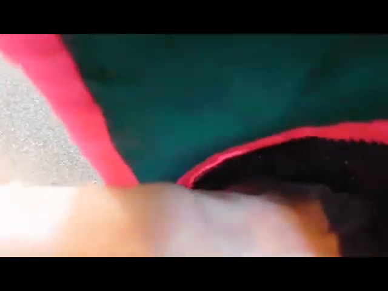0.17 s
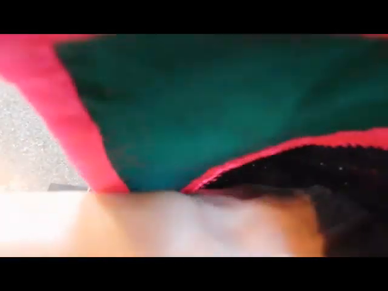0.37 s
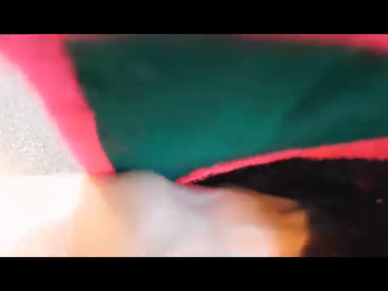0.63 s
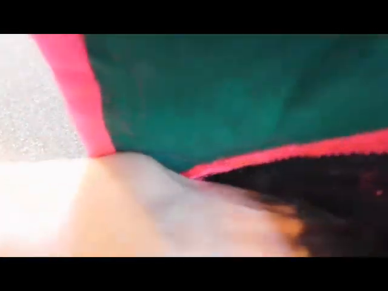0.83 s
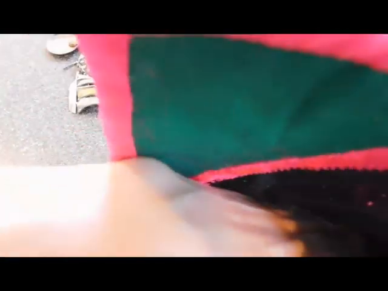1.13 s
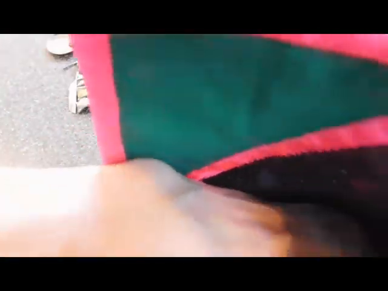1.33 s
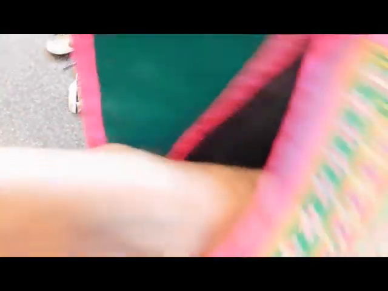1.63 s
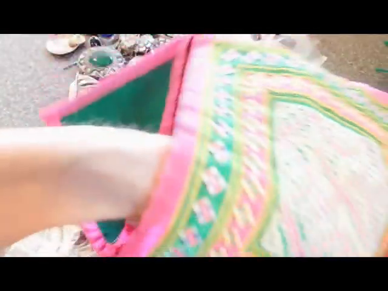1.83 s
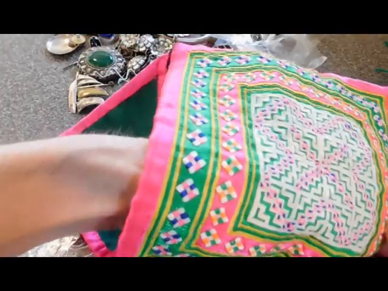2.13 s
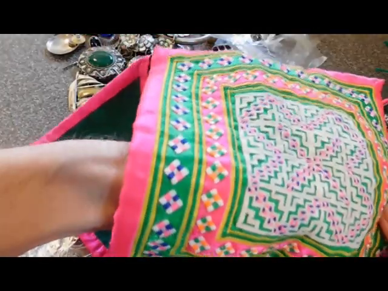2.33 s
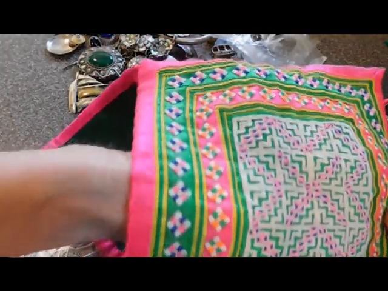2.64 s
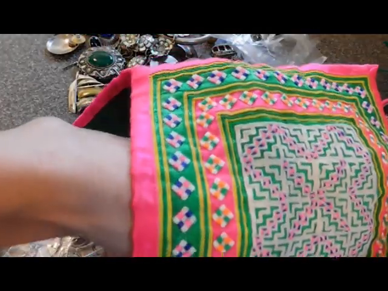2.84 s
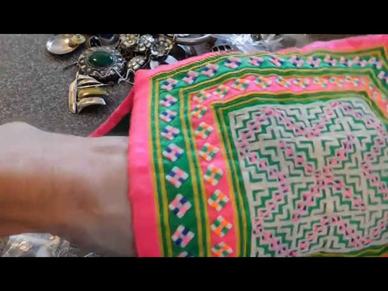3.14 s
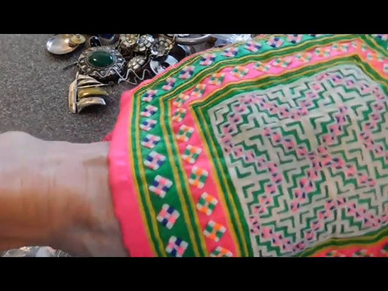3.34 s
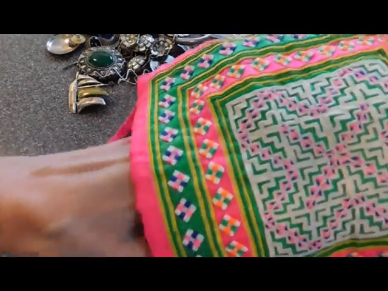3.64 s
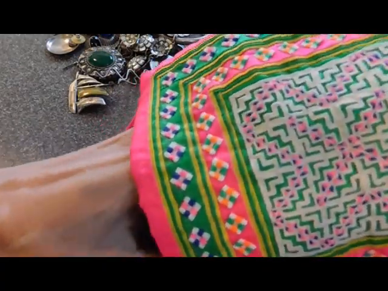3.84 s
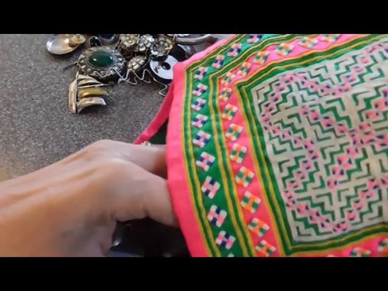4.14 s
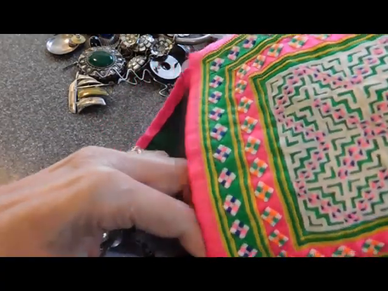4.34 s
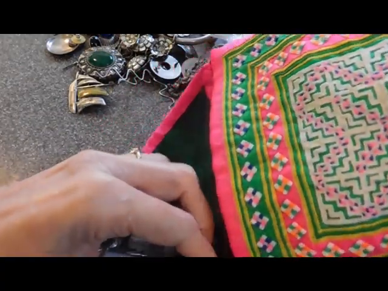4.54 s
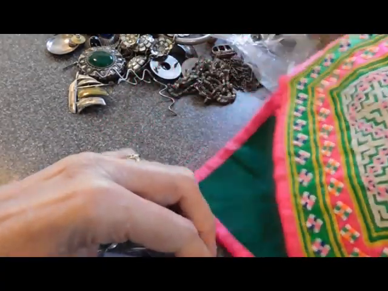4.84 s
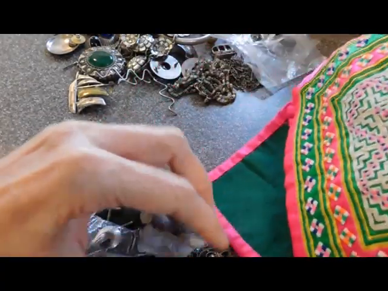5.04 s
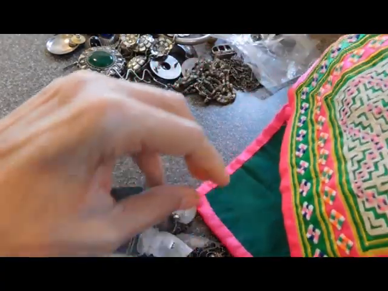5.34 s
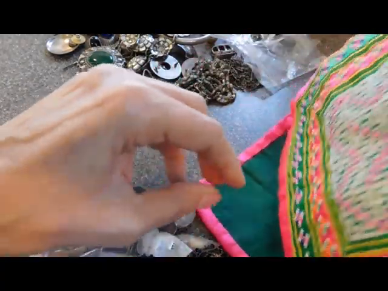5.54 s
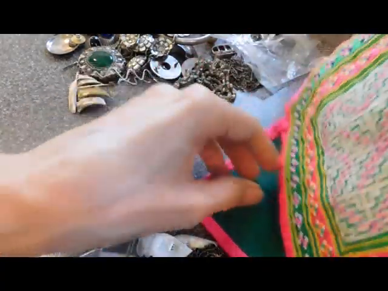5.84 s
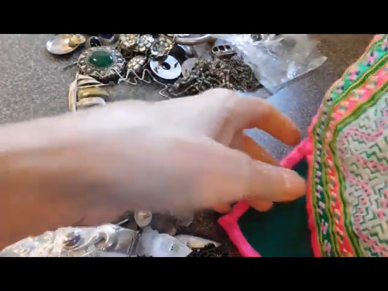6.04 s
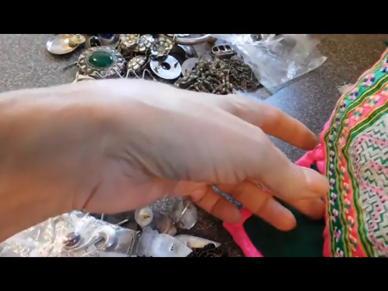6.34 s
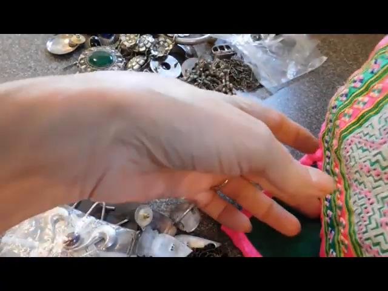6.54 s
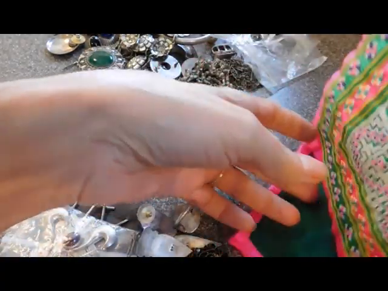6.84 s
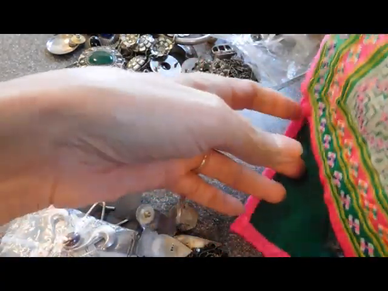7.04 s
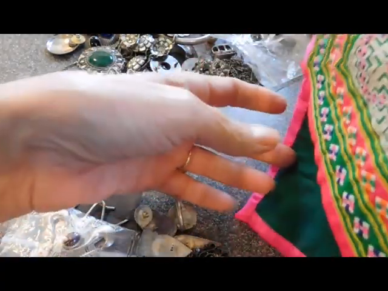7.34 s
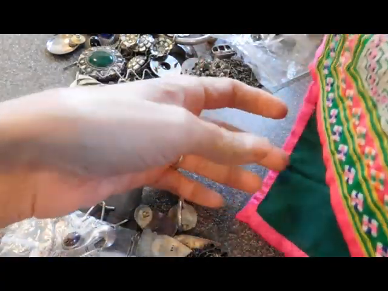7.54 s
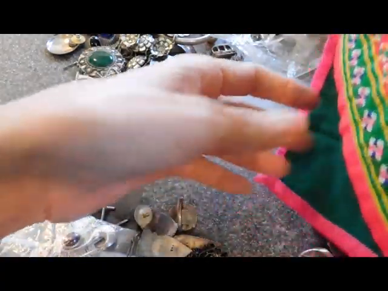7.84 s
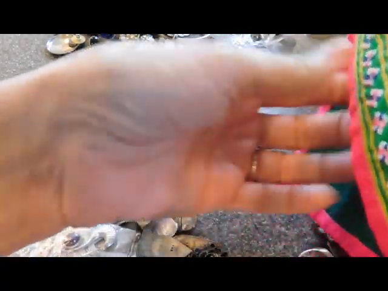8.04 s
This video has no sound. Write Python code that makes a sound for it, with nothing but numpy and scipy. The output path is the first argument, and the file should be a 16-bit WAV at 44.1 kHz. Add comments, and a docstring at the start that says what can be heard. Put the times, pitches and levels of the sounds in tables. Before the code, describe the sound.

Close up in a quiet room, small metal jewelry pieces tick and tinkle lightly as a fabric bag is handled. After a short pause the clinking thickens, mixed with grainy cloth rustle and knocks on the table, and a bangle rings out briefly. The bag slides with a soft rasp, the clinks thin out, then several pieces clatter sharply onto the tabletop. Faint air noise, rumble and hiss lie underneath.

```python
"""Small metal pieces clink and chatter as a hand rummages in a cloth bag of jewellery on a hard table.
Each contact ticks, sets the pieces ringing and leaves a sizzle of chain links. Cloth drags over the
table top and heavier things knock on it, both sounding its resonances. It is all close and in stereo;
the quiet room answers with a short tail over ventilation, rumble, a faint hum and microphone hiss."""
import sys
import numpy as np
from scipy import signal
from scipy.fft import rfft, irfft
from scipy.io import wavfile
from scipy.ndimage import uniform_filter1d, map_coordinates

SR = 44100
rng = np.random.default_rng(int(sys.argv[2]) if len(sys.argv) > 2 else 0)


def file_out(sig):
    """Save sig as 16-bit WAV at sys.argv[1]."""
    # one column per channel
    cols = np.atleast_2d(sig).T
    # limit, then scale
    lim = np.clip(cols, -1, 1)
    pcm = np.round(lim * 32767).astype(np.int16)
    wavfile.write(sys.argv[1], SR, pcm)


N = 361476
T = np.arange(N) / SR
SIDES = np.array([[1], [-1]])  # left, right: a positive pan leans left

# Metal meeting metal. Each row: start in seconds, tick in dB, then any pieces struck, each with its
# ring level in dB.
CONTACTS = [(0.5234, -60), (0.5423, -48.5, "cap", -60, "charm", -63), (0.51, -59, "medal", -66),
            (0.5925, -54, "cap", -62, "clasp", -59), (0.7153, -50, "clasp", -60, "charm", -59),
            (0.7741, -57, "bangle", -67), (0.9118, -53, "pendant", -52, "charm", -60),
            (0.9537, -45, "pendant", -50, "charm", -54, "ring", -58), (0.968, -50, "bangle", -59),
            (1.032, -56, "pendant", -62),
            (1.08, -40.5, "pendant", -47.5, "charm", -49, "bangle", -57, "medal", -56),
            (1.1646, -48, "medal", -54, "charm", -57, "pendant", -58), (2.2677, -51, "pendant", -61),
            (2.2997, -49, "medal", -50, "clasp", -53),
            (2.3311, -38, "charm", -42, "cap", -44, "medal", -39, "ring", -48),
            (2.3533, -40, "pendant", -41, "medal", -38.5, "charm", -43, "clasp", -47.5),
            (2.3771, -36.5, "pendant", -36.5, "charm", -42, "cap", -48, "clasp", -50),
            (2.4104, -53, "pendant", -54, "charm", -56), (2.4988, -49, "bangle", -49.5, "pendant", -53),
            (2.7074, -49, "bangle", -47, "clasp", -50), (2.7324, -39, "bangle", -36.5, "clasp", -49),
            (2.7848, -45, "medal", -39, "charm", -49),
            (2.8078, -46, "charm", -39, "pendant", -44, "medal", -45, "clasp", -50.5),
            (2.8305, -52, "charm", -42, "bangle", -44.5, "pendant", -47.5, "clasp", -49),
            (2.9302, -50, "clasp", -51, "bangle", -53), (2.974, -45, "bangle", -44.5, "clasp", -54),
            (3.034, -48, "bangle", -40, "charm", -57),
            (3.0544, -40.5, "bangle", -38, "clasp", -52, "cap", -52),
            (3.0753, -43, "bangle", -36.5, "charm", -50), (3.1483, -42.5, "bangle", -43.5, "clasp", -61),
            (3.249, -46, "bangle", -50, "charm", -55, "clasp", -56), (3.3084, -64, "bangle", -50),
            (3.3532, -48, "bangle", -38, "clasp", -50),
            (3.4444, -52, "bangle", -46, "charm", -50, "pendant", -53),
            (3.455, -54, "clasp", -44, "bangle", -45.5, "charm", -54), (3.485, -58, "bangle", -35),
            (3.5314, -53, "bangle", -43, "medal", -55), (3.727, -47, "bangle", -45, "clasp", -53.5),
            (3.9426, -61, "bangle", -47, "clasp", -61),
            (3.981, -46.5, "bangle", -47, "clasp", -54, "pendant", -55, "charm", -57), (4.362, -51),
            (4.5838, -49, "cap", -52, "bangle", -57), (4.6598, -38.5, "cap", -46, "charm", -52),
            (4.7098, -53, "bangle", -50, "clasp", -56),
            (4.8848, -33.5, "bangle", -25, "clasp", -35, "cap", -36),
            (4.9472, -47, "bangle", -39, "clasp", -50), (4.9781, -41.5, "bangle", -32, "clasp", -48),
            (4.9982, -55, "charm", -51, "clasp", -56), (5.0553, -43, "bangle", -50),
            (5.0823, -39, "cap", -45, "bangle", -52, "clasp", -54),
            (5.1427, -43, "bangle", -39.5, "clasp", -52, "cap", -50), (5.1994, -58, "bangle", -44),
            (5.2214, -65, "bangle", -49), (5.2839, -56, "bangle", -60), (5.312, -54, "cap", -54),
            (5.382, -51, "cap", -55), (4.8, -65, "ring", -62), (5.471, -62, "bangle", -60),
            (5.536, -65, "bangle", -53), (5.7862, -55, "bangle", -60, "cap", -64),
            (5.8874, -62, "bangle", -56), (6.1295, -50, "ring", -47), (6.1858, -56, "ring", -51),
            (6.8917, -50, "ring", -56), (7.1384, -54, "bangle", -65),
            (7.215, -33, "medal", -35, "bangle", -49, "pendant", -47),
            (7.2728, -37, "medal", -36, "ring", -40.5, "bangle", -42),
            (7.2938, -45, "medal", -37, "bangle", -47), (7.3044, -43, "medal", -40, "ring", -47),
            (7.3294, -50, "medal", -50, "clasp", -52), (7.395, -45, "ring", -41, "cap", -48),
            (7.4098, -49, "bangle", -50, "ring", -52)]
# The table top's low resonances and its deeper thump. Each row: pitch in Hz, width in Hz, gain in dB.
TABLE_LOW_MODES = [(838, 315, -2), (967, 370, -3)]
TABLE_THUMP_MODES = [(216, 146, -2.5), (424, 410, 2)]


def undb(db):
    """Decibels to gain."""
    return 10 ** (np.asarray(db) / 20)


def unit(x):
    """Scale to rms 1."""
    return x / np.sqrt(np.mean(x ** 2))


def pan(db):
    """Left and right gains, db apart."""
    return undb(SIDES * db / 2)


def wander(rate):
    """A smooth drift through rate random values a second, at rms 1."""
    return unit(map_coordinates(rng.standard_normal(size=2000), [T * rate], order=2, mode="wrap"))


def stereo_noise(split_hz, count=N):
    """Noise that is centred in the bass and wide above split_hz."""
    mid, side = rng.standard_normal((2, count))
    return mid + SIDES * signal.lfilter(*signal.butter(1, split_hz, "high", fs=SR), side)


def resonate(x, modes):
    """Sum of steep resonances (each applied twice); white noise keeps about its rms."""
    power = sum(undb(2 * db) * np.pi * width / SR / 2 for _, width, db in modes)
    out = 0
    for hz, width, db in modes:
        b, a = signal.iirpeak(hz, hz / width, fs=SR)
        out += undb(db) * signal.lfilter(b, a, signal.lfilter(b, a, x))
    return out / np.sqrt(power)


def bursts(times, db, pan_db, decay_s):
    """Stereo envelope: a sudden rise and exponential fall at each time."""
    spikes = np.zeros((2, N))
    np.add.at(spikes.T, (times * SR).astype(int), (undb(db) * pan(pan_db)).T)
    return signal.lfilter([1], [1, -np.exp(-1 / (decay_s * SR))], spikes)


def swells(starts, lengths, db, attack_s, release_s):
    """Envelope of overlapping swells: each rises, holds and dies away exponentially."""
    out = np.zeros(N)
    for start, length, gain in zip(starts, lengths, undb(db)):
        rise = np.clip((T - start) / attack_s, 0, 1)
        out += gain * rise * np.exp(-np.maximum(T - start - length, 0) / release_s)
    return out


def ventilation(level_db=-56, drift_db=1.78):
    """A soft rush of air, gently drifting in level and wider toward the treble."""
    # Tone of the air. Each row: frequency in Hz, relative level in dB.
    spectrum = [(41, -51), (70, -6.5), (108, -9), (219, -5), (344, -8), (869, -8.5), (1230, -10),
                (1490, -6), (1620, -10), (2600, -11.5), (5770, -21.5), (12000, -31), (15600, -46),
                (22000, -120)]
    # Stereo image. Each row: frequency in Hz, left-right likeness from 0 to 1.
    likeness = [(60, 0.89), (130, 0.61), (290, 0.32), (640, 0.11), (1400, 0.18), (3100, .01)]
    log_hz = np.log(np.maximum(np.fft.rfftfreq(N, 1 / SR), 1))
    tone_db, alike = (np.interp(log_hz, np.log(hz), values)
                      for hz, values in (np.transpose(spectrum), np.transpose(likeness)))
    mid, side = rfft(rng.standard_normal((2, N)))
    spread = np.sqrt(1 + alike) * mid + SIDES * np.sqrt(1 - alike) * side
    rush = unit(irfft(undb(tone_db) * spread, N))
    return undb(level_db + drift_db * wander(3.247)) * rush


def rumble():
    """The building's deep rumble and a drone above it, both swelling slowly."""
    # Level ride. Each row: time in seconds, deep rumble in dB, drone in dB.
    ride = [(0.0, -62, -74), (0.7, -67, -77), (1.7, -63, -79), (3.1, -62.5, -67), (3.9, -62.5, -66),
            (4.7, -63, -70), (5.9, -59.5, -68), (6.45, -62, -65), (6.9, -58.5, -63), (7.7, -62, -68),
            (8.2, -64, -64)]
    # Resonances of the two layers. Each row: pitch in Hz, width in Hz, gain in dB.
    deep_modes = [(29.5, 13, -6), (49.7, 12, 1), (63, 15.5, -6.5)]
    drone_modes = [(133, 72, 0)]
    times, *levels = np.transpose(ride)
    deep_gain, drone_gain = (undb(np.interp(T, times, db)) for db in levels)
    deep = unit(resonate(stereo_noise(300), deep_modes))
    drone = resonate(stereo_noise(380), drone_modes)
    return deep_gain * deep + drone_gain * drone


def hum(waver_db=2, waver_rad=1.5):
    """A faint, wavering low tone that comes and goes."""
    # Spells of hum. Each row: start in seconds, length in seconds, pitch in Hz, level in dB.
    spells = [(2.048, 0.61, 190, -68.5), (6.25, 1.3, 200, -67.5)]
    out = 0
    for start, length, hz, db in spells:
        tone = np.sqrt(2) * np.sin(2 * np.pi * hz * T + waver_rad * wander(5))
        out += tone * swells([start], [length], [db], attack_s=.11, release_s=.08)
    return out * undb(waver_db * wander(12))


def room_tone(pan_db=-1.5, lag_samples=4, hiss_db=-63):
    """Ventilation, rumble and hum reach the right microphone first; both microphones hiss."""
    left, right = (ventilation() + rumble() + hum()) * pan(pan_db)
    hiss = undb(hiss_db) * rng.standard_normal((2, N))
    return np.array([np.roll(left, lag_samples), right]) + hiss


def room_tail(x, gap_s=.00355, low_t60=.62, treble_t60=.48, low_db=-4.5, treble_db=-5):
    """The walls return a diffuse tail after a short gap; the treble dies sooner."""
    t = np.arange(SR) / SR
    noise = stereo_noise(1500, count=SR)
    low = signal.sosfilt(signal.butter(2, 3500, fs=SR, output="sos"), noise)
    tail = 0
    for band, db, t60 in ((low, low_db, low_t60), (noise - low, treble_db, treble_t60)):
        decay = np.log(1000) / t60
        tail += undb(db) * band * np.exp(-decay * t) * np.sqrt(2 * decay / SR)
    return signal.fftconvolve(x.mean(axis=0, keepdims=True), tail * (t > gap_s), axes=1)[:, :N]


def fibre_grains(split_hz, grain_db=1.3, slip_db=2.6):
    """Fibres catch and slip, making grainy, uneven noise."""
    noise = stereo_noise(split_hz)
    return unit(noise * undb(grain_db * rng.exponential(size=N) + slip_db * wander(45)))


def cloth(fidget_db=3, thump_db=-9, pan_db=-3):
    """Dragged cloth rubs the table into a low murmur, with a rasp and a fine crackle on top."""
    # Drags of the bag. Each row: start and length in seconds, then body, rasp and crackle in dB.
    strokes = [(0.14, .06, -72, -70, -68), (0.345, .03, -58, -62, -72), (0.57, .04, -68, -60, -72),
               (0.71, 0.041, -70, -62, -68), (0.92, .2, -74, -68, -68), (1.891, 0.048, -56, -63, -76),
               (2.3, .12, -64.5, -58.5, -66), (2.49, 0.027, -66, -55, -70), (2.675, .05, -51.5, -50, -65),
               (2.775, .07, -62, -55, -55), (3.016, .15, -56, -50, -58), (3.2, .17, -58, -57, -67),
               (3.429, 0.065, -56, -53, -59), (3.549, 0.027, -55, -60, -66),
               (3.658, .12, -56.5, -55.5, -63.5), (3.827, 0.066, -56.5, -50, -76),
               (3.936, 0.066, -54.5, -45, -73), (4.283, .16, -59, -58, -65.5),
               (4.561, 0.082, -53, -55.5, -63), (4.678, 0.058, -51, -44, -66), (4.758, .16, -51, -53, -73),
               (4.929, 0.095, -49.5, -41, -70), (5.077, .14, -55.5, -48, -75),
               (5.3, 0.062, -53.5, -47, -77), (5.4, .15, -56, -52, -78), (5.63, .2, -53, -52, -74),
               (5.86, .18, -51, -49.5, -76), (6.045, .12, -62, -51, -74), (6.2, .3, -65, -66, -74),
               (6.838, 0.11, -52, -49.5, -79), (7.135, .025, -62, -48, -72), (7.218, .08, -56, -37.5, -66),
               (7.32, .06, -53, -36, -62), (7.39, .07, -52, -44, -58), (7.6, .4, -66, -74, -80)]
    # The cloth is never quite still: resting levels of body, rasp and crackle in dB.
    resting_db = (-72, -72, -77)
    # Colour of the rasp. Each row: pitch in Hz, width in Hz, gain in dB.
    rasp_modes = [(1505, 440, -1.5), (1789, 496, 2), (2135, 810, -2.5), (2814, 1500, -9.5)]
    starts, lengths, *levels = np.transpose(strokes)
    fidget = fidget_db * wander(6)
    body_gain, rasp_gain, crackle_gain = (
        swells(starts, lengths, db, attack_s=.022, release_s=.026) + undb(rest + fidget)
        for db, rest in zip(levels, resting_db))
    treble = signal.butter(2, [3600, 12000], "band", fs=SR, output="sos")
    crackle = unit(signal.sosfilt(treble, fibre_grains(1500)))
    body = resonate(fibre_grains(1800), TABLE_LOW_MODES)
    body += undb(thump_db) * resonate(fibre_grains(2200), TABLE_THUMP_MODES)
    rasp = resonate(fibre_grains(1600), rasp_modes)
    return (body_gain * body + rasp_gain * rasp + crackle_gain * crackle) * pan(pan_db)


def table_knocks(blow_s=.0026, tail_s=.017, tail_db=-11, low_db=-4.5, high_db=1.5, thump_db=4.5):
    """Ragged blows of a few milliseconds drive the low, high and thump resonances of the table top."""
    # Heavier things landing. Each row: start in seconds, low, high and thump levels in dB, pan in dB.
    blows = [(0.346, -46, -55, -63, 3), (0.357, -43, -53, -63, 3), (0.388, -48, -62, -68, 3),
             (1.909, -48, -69, -63, -3.5), (2.676, -44, -60, -64, 1), (2.727, -29.5, -44, -46, -3),
             (2.935, -47, -52, -53, -5), (3.212, -61, -56, -64, 0), (3.832, -44, -56, -71, -2),
             (4.397, -48, -47, -64, 3), (4.66, -30, -28, -47, -4.5), (4.672, -35, -38, -60, -3.0),
             (4.868, -43, -41.5, -57, -5), (4.947, -37, -42, -56, 2), (5.081, -37, -31.5, -49, -6),
             (5.143, -47, -40, -59, -5), (5.308, -47, -48.5, -61, -3.0), (5.334, -44, -42.5, -63, -3),
             (6.118, -50, -57, -43, -1), (6.392, -45.5, -52.5, -65, -6), (6.853, -44, -63, -53, 0),
             (7.148, -55, -48, -53, -1), (7.214, -23, -21, -38.5, -4.0), (7.227, -41, -28, -48, -3),
             (7.274, -33, -25, -44, -5), (7.294, -24.5, -22.5, -38.5, -3), (7.306, -27.5, -30.5, -54, -4.5)]
    # The table top's bright resonances. Each row: pitch in Hz, width in Hz, gain in dB.
    high_modes = [(1520, 550, 0), (1684, 190, 4.5), (2340, 510, -3.5), (2756, 1330, 0), (3690, 4000, -11)]
    starts, low, high, thump, pan_db = np.transpose(blows)
    out = 0
    for modes, db in ((TABLE_LOW_MODES, low + low_db), (high_modes, high + high_db),
                      (TABLE_THUMP_MODES, thump + thump_db)):
        force = bursts(starts, db, pan_db, blow_s) + bursts(starts, db + tail_db, pan_db, tail_s)
        force = uniform_filter1d(force, size=40, origin=19)  # the contact builds over a millisecond
        out += resonate(stereo_noise(2300) * force, modes)
    return out


def chain(tick_db=-4.5, sizzle_db=-8.5, tick_s=.0042, sizzle_s=.027, grit_db=3, pan_db=-2):
    """A broad tick at each contact, then the gritty sizzle of chain links settling."""
    starts, contact_db = np.transpose([row[:2] for row in CONTACTS])
    treble = signal.butter(1, [4000, 11000], "band", fs=SR, output="sos")
    noise = unit(signal.sosfilt(treble, stereo_noise(1500)))
    tick = bursts(starts, contact_db + tick_db, pan_db, tick_s)
    tick = uniform_filter1d(tick, size=60, origin=29)  # rounds the attack
    grit = undb(grit_db * wander(200))
    sizzle = grit * bursts(starts, contact_db + sizzle_db, pan_db, sizzle_s)
    return noise * (tick + sizzle)


def choked_ring(impulses, hz, t60, clank_t60=.038, clank_db=.6, ring_db=-4.5):
    """One metal mode, as a complex tone: neighbours and cloth choke most of it; the rest sings on."""
    fast, slow = np.exp(2j * np.pi * hz / SR - np.log(1000) / (np.array([clank_t60, t60]) * SR))
    clank, ring = undb([clank_db, ring_db])
    return signal.lfilter([clank + ring, -clank * slow - ring * fast], np.poly([fast, slow]), impulses)


def jewellery(max_bounce_s=.02, bounce_db=-5.5, scatter_db=3, sway_db=2.5, sway_rad=.87,
              jostle_db=-21.5, jostle_spread_db=4.5, mic_spread_rad=1.1, pan_db=-1):
    """Each contact rings the pieces and bounces twice; swinging pieces waver in level and pitch."""
    # Modes of each piece. Each row: pitch in Hz, gain in dB, seconds to fade by 60 dB.
    trinkets = [(3560, 4, .05), (4330, 3, .06), (4670, 3, .06), (5520, 4, .06), (6350, 3, .05),
                (6650, 0, .06), (7130, 3, .08), (7660, 3, .07), (8440, 0, .08), (9200, 0, .08),
                (11800, 3, .1), (13100, 0, .08), (13650, 0, .08), (14600, 4, .1)]  # loose small pieces, only ever jostled
    bangle = [(3480, -12, .05), (5710, -8, .08), (5785, -2, .16), (6030, -14, .05)]
    pendant = [(7000, -26, .12), (9730, -4.5, 0.19), (9850, -3, 0.2)]
    charm = [(14285, -7, .15), (15055, -2, 0.18), (15210, 0, .18)]
    small_ring = [(4300, -7, .1), (5050, -7, .12), (8790, -7, .06), (11980, 0, .13), (13510, -12, .04)]
    bead_cap = [(12300, 0, .2), (14500, -11, .1)]
    clasp = [(8140, -2, 0.27), (10680, 1, 0.19), (12730, -5.5, 0.22)]
    medallion = [(3160, -4, .14), (11780, -11, .12)]
    pieces = dict(trinkets=trinkets, bangle=bangle, pendant=pendant, charm=charm,
                  ring=small_ring, cap=bead_cap, clasp=clasp, medal=medallion)
    starts, contact_db = np.transpose([row[:2] for row in CONTACTS])
    struck = [dict(zip(row[2::2], row[3::2])) for row in CONTACTS]
    delays = np.cumsum(rng.random((len(starts), 3)), axis=1) * max_bounce_s
    delays -= delays[:, :1]
    hits = ((starts[:, None] + delays) * SR).astype(int)
    out = np.zeros((2, N))
    for name, modes in pieces.items():
        struck_db = [levels.get(name, -np.inf) for levels in struck]
        swing = undb(sway_db * wander(70)) * np.exp(1j * sway_rad * wander(60))
        for hz, mode_db, t60 in modes:
            # pieces that are not struck are still jostled through the cloth
            jostled_db = contact_db + jostle_db + jostle_spread_db * rng.standard_normal(len(starts))
            hit_db = np.maximum(struck_db, jostled_db)[:, None] + mode_db + bounce_db * np.arange(3)
            # each contact point excites a mode differently; it reaches each microphone in its own phase
            hit_db += scatter_db * rng.standard_normal(hits.shape) * (delays > 0)
            phase = 2 * np.pi * rng.random(hits.shape)
            phase_gap = np.pi / 2 + mic_spread_rad * rng.standard_normal(hits.shape)
            impulses = np.zeros((2, N), complex)
            for mic in range(2):
                np.add.at(impulses[mic], hits, undb(hit_db) * np.exp(1j * (phase + mic * phase_gap)))
            out += (swing * choked_ring(impulses, hz, t60)).imag
    return out * pan(pan_db)


def scene(bag_db=-7):
    """Rummaging over the room tone; the bag shades the ringing jewellery from the walls."""
    ringing = jewellery()
    handling = chain() + table_knocks() + cloth()
    return ringing + handling + room_tail(undb(bag_db) * ringing + handling) + room_tone()


def record(dry, top_hz=15820):
    """A steep low-pass takes off the very top of the treble."""
    return signal.sosfilt(signal.ellip(10, .2, 70, top_hz, fs=SR, output="sos"), dry)


dry = scene()
out = record(dry)
file_out(out)
```